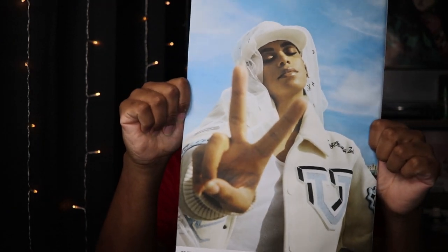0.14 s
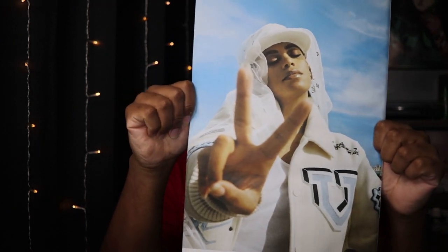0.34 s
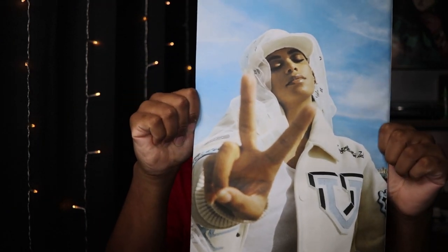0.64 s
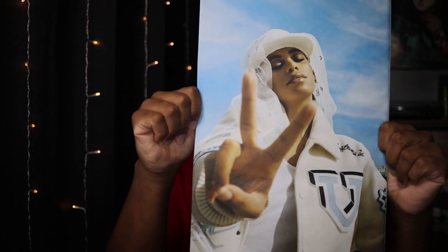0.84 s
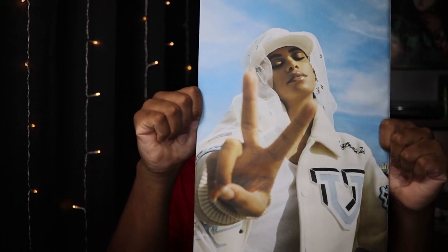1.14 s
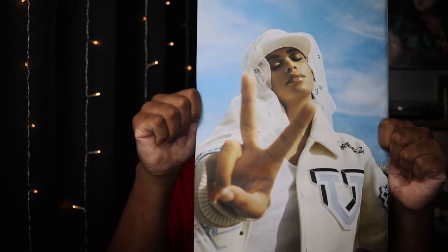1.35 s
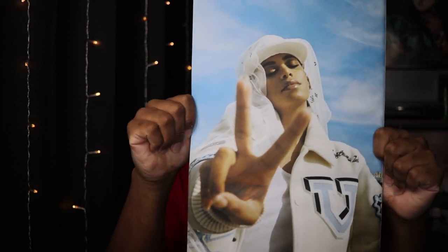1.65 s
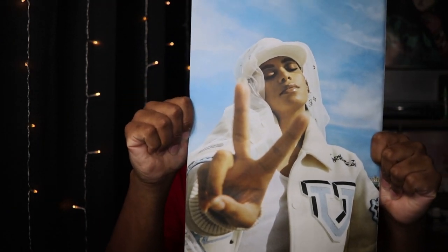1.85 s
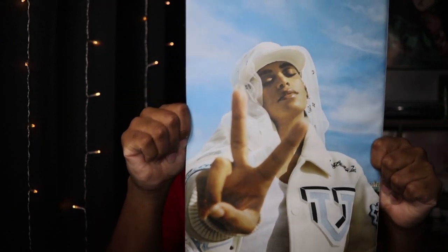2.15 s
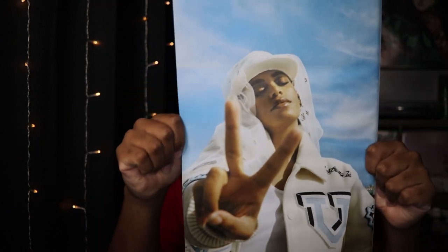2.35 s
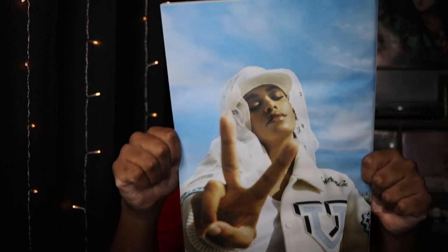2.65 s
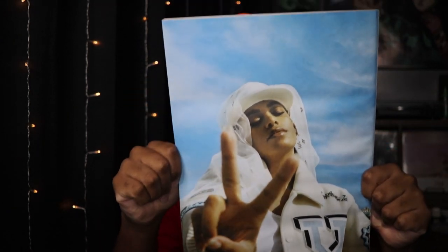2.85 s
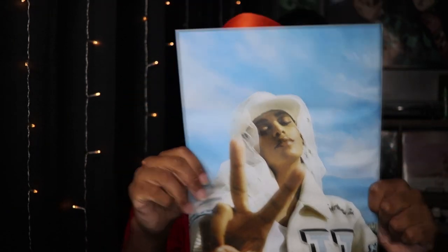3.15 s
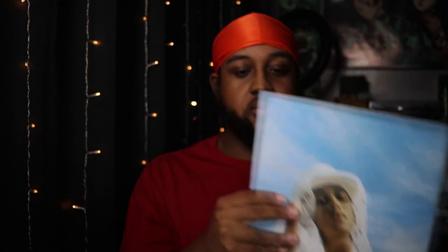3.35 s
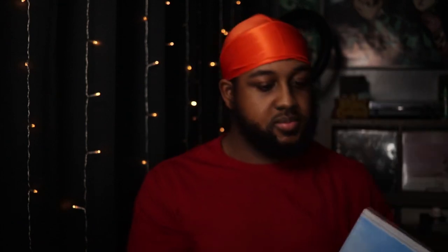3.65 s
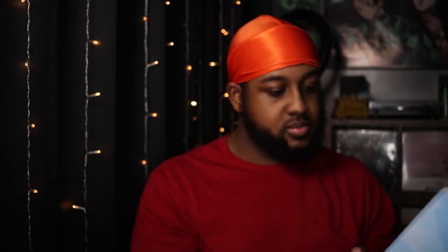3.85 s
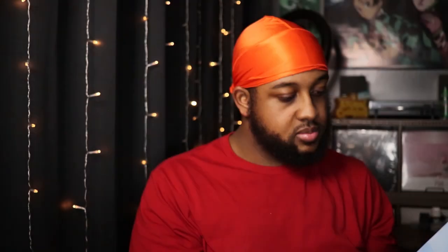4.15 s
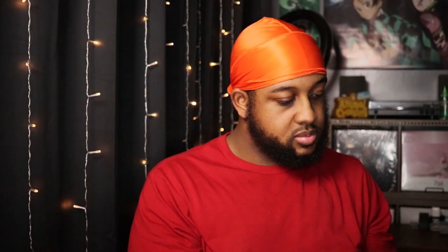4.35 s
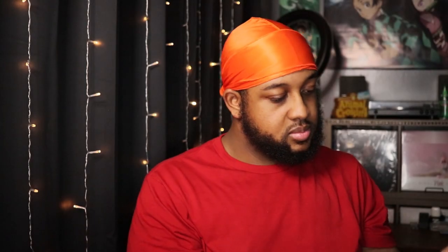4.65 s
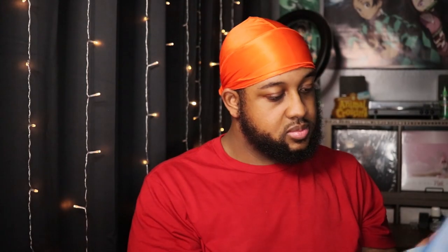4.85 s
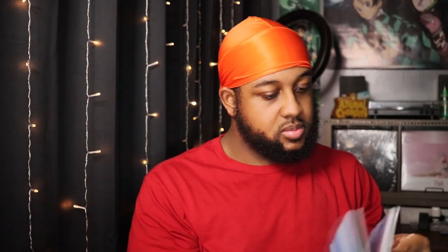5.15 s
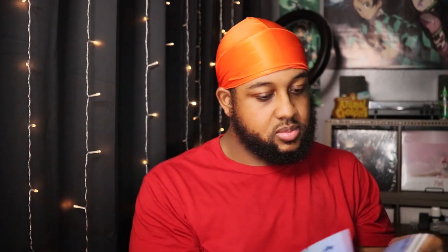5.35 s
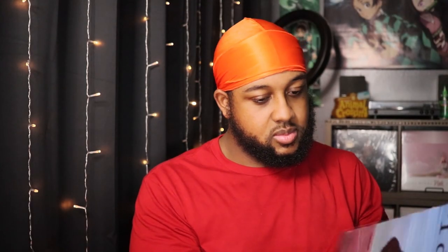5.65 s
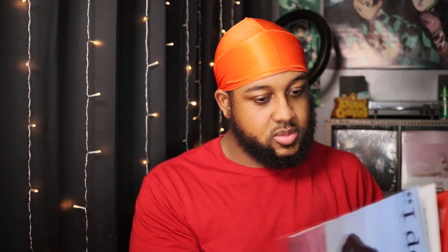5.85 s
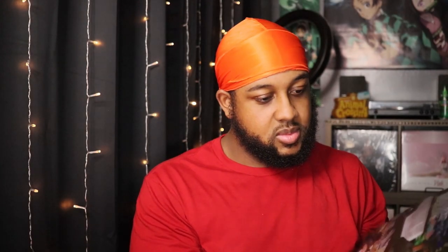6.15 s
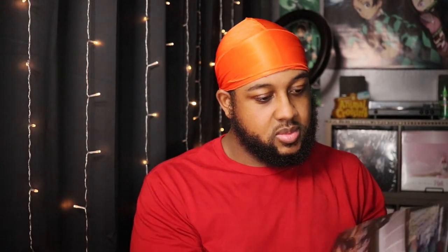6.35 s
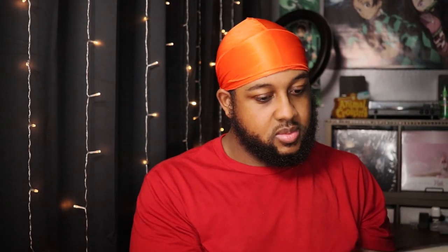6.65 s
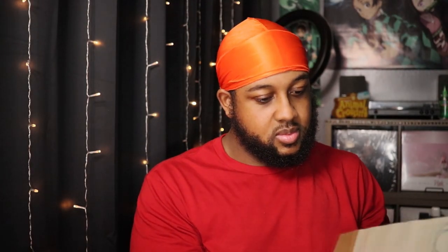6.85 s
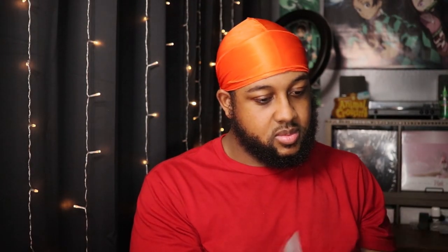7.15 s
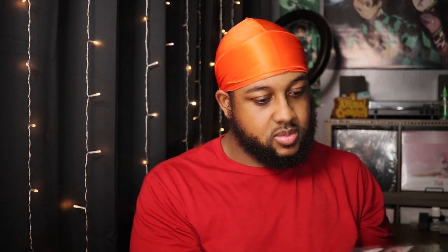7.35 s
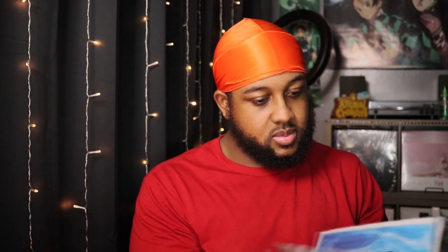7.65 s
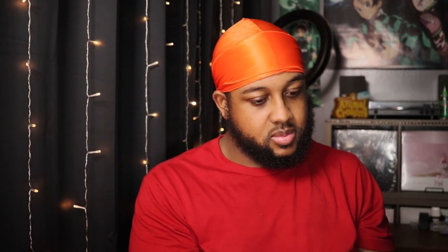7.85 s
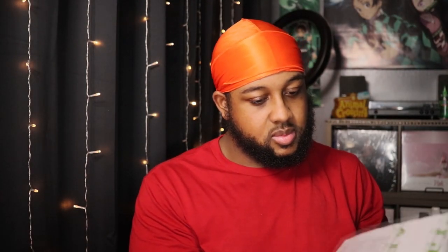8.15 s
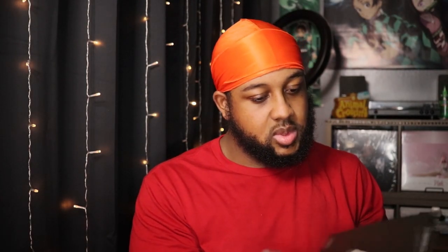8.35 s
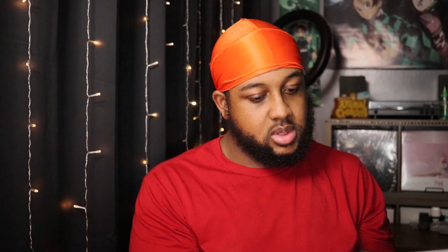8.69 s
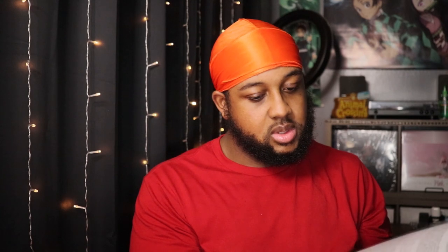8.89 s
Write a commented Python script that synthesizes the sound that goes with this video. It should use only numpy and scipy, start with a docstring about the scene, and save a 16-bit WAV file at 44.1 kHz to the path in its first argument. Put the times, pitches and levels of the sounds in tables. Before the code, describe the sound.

A small quiet room holds a steady, soft ventilation rumble with a wavering very low tone, slightly stronger on the left. From about 1 to 3.7 s a faint distant engine note swells unevenly and sinks slowly in pitch. Barely audible paper ticks and sizzles come near 0.7 to 1 s. At 3.15 s a large glossy sheet snaps sharply, then more snaps and crumples follow, with a bright crack at 3.8 and another cluster near 4.05. A very brief, faint low hum swells at 4.3. Pages slide with airy hiss and pop at 4.4, 4.7 and 5, with a strong hollow buckle at 5.35. Flexing continues around 5.7 to 6.1, thins out near 6.3, then lighter rustles and ticks run from 6.5, with duller pops at 7.35, crackles around 7.95 and 8.2, a crisp tick at 8.35 and last low creases near 8.7. Close stereo, short dry reverberation.

```python
"""Large glossy pages are handled and turned by hand near two microphones in a small quiet room.
Sliding sheets hiss and sizzle as showers of filtered grains, flexing ones crumple around the pitch of the bend,
and buckling creases snap as impulses with fluttering tails that excite the sheet's resonances.
A ventilation rumble of noise rings in the room's low modes above a wavering low tone;
a distant engine note, two gliding sines, sinks as it passes, and once a short low sine swells and fades."""
import sys
import numpy as np
from scipy import signal
from scipy.fft import rfft, irfft, next_fast_len
from scipy.io import wavfile
from scipy.ndimage import uniform_filter1d

SR = 44100
rng = np.random.default_rng(int(sys.argv[2]) if len(sys.argv) > 2 else 0)


def generate_wav(signal):
    """Clip the signal to [-1, 1] and save it as 16-bit WAV at the path in sys.argv[1]."""
    frames = np.transpose(np.atleast_2d(signal))
    scaled = np.clip(frames, -1, 1) * 32767
    pcm = np.round(scaled).astype(np.int16)
    wavfile.write(sys.argv[1], SR, pcm)


def elevation(decibels):
    """Turn decibel levels (scalar or array-like) into linear amplitude ratios."""
    levels = np.asarray(decibels, float)
    return 10 ** (levels / 20)


N = 397782   # length in samples
CONTROL_STEP = 40   # samples between points of a slow curve

# steady noise of the room air: f/Hz, relative level/dB per Hz
AIR_SPECTRUM = [(12, -42), (20, 8), (49, -9), (130, -3), (228, -3), (293, -7), (328, -13.5), (434, -5.5),
                (624, -14), (923, -19), (1150, -21), (1910, -28), (2700, -33.5), (4500, -37), (7310, -41),
                (14300, -52), (16000, -48)]
# room resonances in which the rumble rings: f/Hz, width/Hz, level/dB
ROOM_MODES = [(57.74, 8.1, 19), (116.4, 12.2, 11), (145.3, 17.7, 8), (208.8, 7, 8), (227.4, 11, 7),
              (269, 3.1, 5), (336.8, 17, 15.5), (425, 38, 3.5), (470, 10.5, 7.5), (526.5, 29, 6.5),
              (1167, 135, 6.5), (1520, 120, 5)]
# likeness of the air noise left and right: f/Hz, correlation/1
AIR_LIKENESS = [(60, 1), (130, 0.98), (290, 1), (640, 0.94), (1410, 0.78), (3100, -0.08), (6820, 0.054),
                (15000, -0.087)]
# swells of the engine note: peak t/s, rise t/s, fall t/s, level/dB
ENGINE_SWELLS = [(1.7, 0.22, 0.31, -33.5), (2.05, .3, 0.46, -39), (2.6, 0.57, .5, -30.5),
                 (3.2, 0.47, 0.14, -30.5), (3.43, 0.085, .1, -36.5), (3.59, 0.092, 0.16, -35.5)]
# swells of the engine's lower octave: peak t/s, rise t/s, fall t/s, level/dB
HALF_NOTE_SWELLS = [(1.1, 0.51, 1.4, -41.5), (3.2, 1.5, .5, -49)]
# one sheet slides over another: peak t/s, rise t/s, fall t/s, slide level/dB, sizzle level over slide/dB
SLIDES = [(.655, .03, .04, -73, 12), (.75, .06, .06, -70, 9), (.96, .03, .04, -74, 13),
          (1.02, .04, .03, -67, 12), (3.166, 0.022, .06, -41, -18), (3.36, 0.1, 0.13, -45, 1.5),
          (3.55, 0.09, 0.25, -49.5, -6), (3.66, 0.29, 0.13, -45.5, -6), (3.79, .015, .025, -42, -13),
          (3.815, .006, .07, -35, -15), (3.93, .1, .15, -49.5, -2), (4.065, 0.094, 0.11, -41.5, -2),
          (4.28, 0.5, .3, -58.5, -5), (4.42, 0.14, .15, -49, -4), (4.6, .2, 0.19, -53.5, -9),
          (4.655, .02, .03, -57, 5), (4.73, 0.024, 0.18, -45.5, -5), (4.95, 0.28, 0.41, -53, -6),
          (5.15, 0.15, .15, -50.5, 0), (5.25, .15, 0.35, -48, 0.5), (5.47, 0.19, .25, -55, -5),
          (5.69, 0.13, 0.15, -50.5, -6), (5.89, .05, 0.11, -45.5, -7), (6.0, .2, .15, -50, -6),
          (6.49, .05, .1, -59, -8), (6.75, .2, 0.39, -49, -2), (6.895, .015, 0.044, -47.5, -6.5),
          (6.983, 0.0079, 0.038, -53.5, -12), (7.053, 0.011, 0.044, -49.5, -11),
          (7.29, 0.11, 0.087, -55, -12), (7.41, .03, 0.054, -53, -6), (7.49, .08, .06, -53.5, -4),
          (7.575, .05, 0.044, -52, -5), (7.65, 0.036, .05, -54, -5), (7.69, .04, .06, -52.5, -8),
          (7.86, .05, .05, -62, -13), (8.155, .015, 0.091, -51, -13), (8.215, .04, .07, -52, -13),
          (8.352, .012, .06, -51, -4), (8.62, .1, 0.054, -56.5, -8), (8.76, .05, .08, -55.5, -6)]
# hiss of sliding paper: f/Hz, relative level/dB per Hz
SLIDE_SPECTRUM = [(1200, -25), (2300, -13), (3200, -5), (4300, -1), (6000, -5), (8500, -8), (11000, -15),
                  (16000, -28)]
# fine sizzle of sliding paper: f/Hz, relative level/dB per Hz
SIZZLE_SPECTRUM = [(6000, -5), (8500, -0.5), (11000, -5), (13500, -1), (15500, -7), (17000, -30)]
# crease snaps: t/s, body peak level/dB, edge level over body/dB, treble level over body/dB, bend f/Hz
SNAPS = [(.705, -40, -6, 6, 1500), (3.146, -43, -5, -8, 1500), (3.164, -24, 0, -4, 1100),
         (3.516, -25, -10, -31, 1100), (3.668, -22, 1, -29, 1130), (3.706, -33, -15, -25, 962),
         (3.784, -30, 0.5, -8, 1670), (3.811, -21, 3, -1, 4500), (3.903, -31, -12, -21, 1560),
         (4.047, -22, -1, -12, 1480), (4.063, -24.5, 4.5, -12, 1620), (4.404, -23, 1, -21, 3000),
         (4.506, -39.5, 7.5, -20, 3330), (4.713, -26.5, 0, -3, 1280), (4.968, -25, -20, -28, 1090),
         (5.214, -35, -20, -18, 1320), (5.352, -20.5, -8, -32, 1830), (5.389, -27.5, -17, -25, 1700),
         (5.589, -30, -2, -16, 2220), (5.687, -30.5, -16, -23, 1710), (5.754, -40, 3.5, -20, 3000),
         (5.889, -38, 2, -14, 1580), (6.059, -30.5, -20, -35, 1430), (6.092, -35, -18, -30, 1610),
         (6.125, -27, -10, -42, 1530), (6.489, -37, -19, -24, 1500), (6.633, -36, -3, -24, 2020),
         (6.729, -39, 4, -14, 2040), (6.832, -34, -7, -20, 1900), (6.888, -31.5, 2.5, -4, 1920),
         (6.976, -33, -1, -15, 2120), (7.046, -30, -4, -4, 1600), (7.239, -36.5, -14, -28, 1640),
         (7.336, -24, -16, -35, 860), (7.359, -29, -28, -30, 850), (7.449, -38, -1, -15, 1500),
         (7.484, -37, -11, -14, 1500), (7.522, -38, 0.5, -20, 2200), (7.57, -37, 4, -12, 2200),
         (7.639, -36, -4, -13, 2100), (7.68, -37.5, -3, -17, 2000), (7.859, -36, 1, -30, 2120),
         (7.929, -28.5, -16, -38, 1300), (7.948, -29, -7, -36, 1560), (7.99, -29.5, -20, -36, 1500),
         (8.149, -29, -7, -11, 2200), (8.178, -30, -2, -24, 2250), (8.209, -26, -4.5, -22, 2300),
         (8.344, -33, 4, 0, 3830), (8.556, -32, -14, -26, 2250), (8.617, -38, 2, -19, 2500),
         (8.696, -32.5, -24, -35, 880), (8.708, -34, -25, 7, 860)]
# mean sheet resonances, lower four its body, upper four its edge: f/Hz, width/Hz, relative level/dB
SHEET_MODES = [(850, 160, 7.5), (1220, 410, 0.5), (1500, 510, 4.5), (2250, 720, -3), (3000, 870, 12.5),
               (4140, 3100, 3), (4360, 120, -1), (5040, 4000, 13)]
# a sheet flexes: peak t/s, rise t/s, fall t/s, crumple level/dB, bend f/Hz
FLEXES = [(3.165, .02, .06, -45, 1600), (3.35, 0.14, .15, -44.5, 1700), (3.55, .15, .2, -49.5, 1210),
          (3.68, 0.11, 0.15, -41, 1200), (3.812, 0.022, 0.042, -33, 1500), (3.815, .006, .07, -31, 4800),
          (3.92, .1, 0.18, -50, 1500), (4.065, .12, 0.12, -39.5, 1600), (4.14, .05, 0.18, -51.5, 2000),
          (4.405, .12, 0.074, -47, 2000), (4.55, .15, 0.29, -46, 1510), (4.72, .02, 0.11, -41, 1290),
          (4.95, .2, .15, -52, 1200), (5.2, .25, 0.28, -49, 1400), (5.358, .025, .09, -30, 1900),
          (5.358, .015, .05, -38, 4400), (5.67, .15, 0.13, -45, 1700), (5.9, .1, .15, -46, 1610),
          (6.05, 0.14, 0.08, -43.5, 1400), (6.133, .03, .08, -38, 1720), (6.13, .015, .045, -42, 3300),
          (6.49, .05, 0.055, -54, 1500), (6.78, 0.23, 0.21, -50, 1960), (7.28, 0.12, .08, -42.5, 1680),
          (7.35, 0.058, 0.1, -38.5, 900), (7.57, .2, .15, -53, 1200), (7.86, 0.095, 0.091, -46, 2080),
          (7.95, 0.042, 0.043, -39, 1490), (7.95, .03, .05, -50, 3500), (8.0, 0.041, 0.077, -42, 1490),
          (8.19, 0.058, 0.11, -45.5, 2250), (8.35, .008, .05, -42, 4000), (8.57, 0.055, 0.09, -47, 2100),
          (8.72, 0.044, 0.11, -41.5, 900)]
# crumple of flexing paper: f/Hz, relative level/dB per Hz
CRUMPLE_SPECTRUM = [(400, -26), (750, 5.5), (1100, 1.5), (1700, -2.5), (2400, -6), (3500, -10.5),
                    (6000, -43)]
# swell of the short low note: peak t/s, rise t/s, fall t/s, level/dB
LOW_NOTE_SWELLS = [(4.3, .12, .12, -36)]


def rms_one(x):
    """Normalization: the mean square is brought to one."""
    return x / np.sqrt(np.mean(x ** 2) + 1e-20)


def at_hz(points, hz):
    """Spectral interpolation: levels run straight along a logarithmic frequency axis."""
    point_hz, level = np.array(points).T
    return np.interp(np.log(hz + 1), np.log(point_hz), level)


def coloured(x, gain):
    """Linear filtering: the spectrum is multiplied by a gain function of frequency."""
    size = next_fast_len(N)
    spectrum = rfft(x, size) * gain(np.fft.rfftfreq(size, 1 / SR))
    return irfft(spectrum, size)[..., :N]


def drift(rate_hz):
    """Low-passed noise: a double real pole leaves slow random motion of unit spread."""
    r = np.exp(-2 * np.pi * rate_hz * CONTROL_STEP / SR)
    start = 2000   # points left for the filter to settle
    white = rng.standard_normal(N // CONTROL_STEP + 2 + start)
    slow = signal.lfilter([1], [1, -2 * r, r * r], white)[start:]
    return np.interp(np.arange(N) / CONTROL_STEP, np.arange(len(slow)), rms_one(slow))


def swells(rows):
    """Incoherent addition: swells (peak s, rise s, fall s, dB) sum in power to one amplitude envelope."""
    swell_db = 20     # rise and fall are the times over this many dB
    roundness = 1.19  # 1 a pointed peak, 2 a bell
    t = np.arange(0, N + CONTROL_STEP, CONTROL_STEP) / SR
    power = 0
    for s, rise, fall, db in rows:
        away = np.where(t < s, (s - t) / max(rise, .005), (t - s) / max(fall, .005))
        power = power + elevation(db - swell_db * np.minimum(away, 3) ** roundness) ** 2
    return np.interp(np.arange(N) / SR, t, np.sqrt(power))


def resonate(x, hz, width_hz):
    """Simple resonance: a damped pole pair with a gain of about one at its peak."""
    r = np.exp(-np.pi * width_hz / SR)
    poles = [1, -2 * r * np.cos(2 * np.pi * hz / SR), r * r]
    return signal.lfilter([(1 - r * r) / 2, 0, (r * r - 1) / 2], poles, x)


def grains(spectrum, per_s, spread_db, clump_db, apart):
    """Shot noise: uneven fibre slips come in clumps; `apart` is the power share unrelated left and right."""
    sizes = elevation(spread_db * np.minimum(rng.exponential(1, (3, N)), 5))
    sizes = sizes * rng.standard_normal((3, N))
    happens = rng.random((3, N)) < per_s / SR
    slips = sizes * happens * elevation(clump_db * drift(30))
    heard = np.sqrt(1 - apart) * slips[0] + np.sqrt(apart) * slips[1:]
    return rms_one(coloured(heard, lambda hz: elevation(at_hz(spectrum, hz))))


def air():
    """Modal excitation: steady broadband noise is lifted at the room modes, alike on both sides in the bass."""
    def colour(hz):
        lift = 0
        for centre, width, db in ROOM_MODES:
            lift = lift + (elevation(db) ** 2 - 1) / (1 + (2 * (hz - centre) / width) ** 2) ** 2
        return elevation(at_hz(AIR_SPECTRUM, hz)) * np.sqrt(np.maximum(1 + lift, .01))

    def likeness(hz):
        return np.clip(at_hz(AIR_LIKENESS, hz), -1, 1)

    mid, side = rng.standard_normal((2, N))
    mid = coloured(mid, lambda hz: colour(hz) * np.sqrt(1 + likeness(hz)))
    side = coloured(side, lambda hz: colour(hz) * np.sqrt(1 - likeness(hz)))
    # the rumble comes from the left: it is stronger there, and the right lags by 5 samples
    both = np.array([mid + side, np.roll(mid - side, shift=5)])
    return elevation(-33.5) * rms_one(both) * elevation([[.45], [-.45]])


def fan():
    """Rotational tone: the ventilation's lowest turning note wavers slightly in pitch and level."""
    hz = 35.2 + .5 * drift(0.55)
    level_db = -51.5 + 0.88 * drift(0.76)
    return np.sqrt(2) * elevation(level_db) * np.sin(2 * np.pi * np.cumsum(hz) / SR)


def engine():
    """Periodic firing: a note and its lower octave, slightly unsteady, sink steadily as the engine passes."""
    start_hz, sag_hz_per_s = 164.2, 5.5
    hz = start_hz - sag_hz_per_s * np.arange(N) / SR + 0.68 * drift(5.2)
    phase = 2 * np.pi * np.cumsum(hz) / SR
    note = swells(ENGINE_SWELLS) * np.sin(phase)
    half_note = swells(HALF_NOTE_SWELLS) * np.sin(phase / 2)
    return np.sqrt(2) * (note + half_note)


def slides():
    """Friction noise: fibre slips between sliding sheets add up to a hiss and a finer sizzle."""
    hiss = grains(SLIDE_SPECTRUM, per_s=6000, spread_db=3.0, clump_db=2.0, apart=0.98)
    sizzle = grains(SIZZLE_SPECTRUM, per_s=10000, spread_db=2.0, clump_db=1.0, apart=0.93)
    hiss_swell = swells([row[:4] for row in SLIDES])
    sizzle_swell = swells([(s, rise, fall, db + over_db) for s, rise, fall, db, over_db in SLIDES])
    return hiss_swell * hiss + sizzle_swell * sizzle


def room(x):
    """Diffuse reverberation: dense decaying reflections, unrelated left and right, are dulled by the walls."""
    t60_s, level_db, wall_cut_hz = 0.063, -11, 9800
    t = np.arange(int(.4 * SR)) / SR
    tail = rng.standard_normal((2, len(t))) * elevation(-60 * t / t60_s)
    tail = tail * (t > .003)   # the first reflection takes 3 ms
    tail = signal.sosfilt(signal.butter(1, wall_cut_hz, fs=SR, output="sos"), tail)
    tail = tail / np.sqrt(np.sum(tail ** 2) / 2)
    return elevation(level_db) * signal.fftconvolve(x, tail, axes=1)[:, :N]


def snaps():
    """Impulse excitation: each buckle's crack and flutter ring the sheet's modes, most near the bend's pitch."""
    crack_s, flutter_db = .00004, -17        # crack decay; flutter level at onset
    uneven_db, mode_shift = 3.5, .04         # chance spread of mode level, and of mode pitch as a share
    off_bend_db = 10.5                       # loss per octave away from the bend's pitch
    bend_width, bend_over_db = 0.046, -9     # the bend's own note: width as a share of its pitch, level
    treble_t60_s, side_db = .07, 2.0         # added treble decay; chance spread of left over right
    out = np.zeros((2, N))
    t = np.arange(int(.2 * SR)) / SR
    noise = rng.standard_normal((len(SNAPS), 3, len(t)))
    chance = rng.standard_normal((len(SNAPS), 2, len(SHEET_MODES)))
    crack = np.exp(-t / crack_s)     # one steep step of the sheet
    edge_pass = signal.butter(2, 8300, fs=SR, output="sos")
    treble_pass = signal.butter(2, 6500, "high", fs=SR, output="sos")
    for draw, (shift, strength), (s, db, edge_db, treble_db, bend_hz) in zip(noise, chance, SNAPS):
        # the crack is one point; the flutter runs along the sheet in uneven slips and differs left and right
        slips = draw[:2] * elevation(3.5 * rms_one(uniform_filter1d(draw[2], size=60)))
        # stronger snaps flutter more briefly
        flutter_t60_s = np.clip(.11 - 0.04 * (db + 27.5), .02, .25)
        burst = crack + slips * elevation(flutter_db - 60 * t / flutter_t60_s)
        rings = []
        for k, (hz, width, level_db) in enumerate(SHEET_MODES):
            ring_db = level_db + uneven_db * strength[k] - off_bend_db * abs(np.log2(hz / bend_hz))
            ring = resonate(burst, hz * (1 + mode_shift * shift[k]), width)
            rings.append((-1) ** k * elevation(ring_db) * ring)   # neighbouring modes in opposite phase
        body = sum(rings[:4])
        edge = signal.sosfilt(edge_pass, sum(rings[4:]))
        treble = signal.sosfilt(treble_pass, burst) * elevation(-60 * t / treble_t60_s)
        bend_note = resonate(burst, bend_hz, bend_width * bend_hz)
        # the note of a bend above 2700 Hz follows the edge level, otherwise the body level
        bend_db = bend_over_db + edge_db * (bend_hz > 2700)
        parts = [(0, body), (edge_db, edge), (treble_db, treble), (bend_db, bend_note)]
        snap = sum(elevation(db + over_db) * part / np.abs(part).max() for over_db, part in parts)
        balance = elevation(side_db * shift[0] * np.array([[.5], [-.5]]))
        at = round(s * SR)
        out[:, at:at + len(t)] += snap[:, :N - at] * balance
    return out


def crumple():
    """Resonant filtering: the grain noise of each flex is lifted around the pitch of the curved sheet."""
    bend_width, bend_db = .6, -8   # width of each filter pass as a share of the pitch; note level over grains
    bend_db_per_octave = 22        # tighter bends, above 2300 Hz, give more of their note
    paper = grains(CRUMPLE_SPECTRUM, per_s=2000, spread_db=3.0, clump_db=2.5, apart=0.41)
    out = np.zeros((2, N))
    for s, rise, fall, db, bend_hz in FLEXES:
        near = slice(round((s - 2 * rise) * SR), round((s + 2 * fall) * SR))
        note = paper[:, near]
        for _ in range(3):   # steep skirts
            note = rms_one(resonate(note, bend_hz, bend_width * bend_hz))
        note_db = bend_db + bend_db_per_octave * max(np.log2(bend_hz / 2300), 0)
        flex = rms_one(paper[:, near] + elevation(note_db) * note)
        out[:, near] += flex * swells([(s, rise, fall, db)])[near]
    return out


def low_note():
    """Pure tone: one brief low sine swells and fades."""
    note_hz = 288
    return np.sqrt(2) * swells(LOW_NOTE_SWELLS) * np.sin(2 * np.pi * note_hz * np.arange(N) / SR)


def scene():
    """Superposition: paper, reaching the left microphone a little later, adds to its reverberation and the rest."""
    left_lag_s = .00005
    paper = slides() + crumple() + snaps()
    paper[0] = np.interp(np.arange(N) - left_lag_s * SR, np.arange(N), paper[0])
    return paper + room(paper) + air() + fan() + engine() + low_note()


def band_limit(x):
    """A steep low-pass at the top of the band."""
    return signal.sosfilt(signal.butter(12, 16370, fs=SR, output="sos"), x)


def record(dry):
    """Band limiting: the microphones drop the deepest bass and a steep filter cuts the top."""
    low_cut_hz, top_cut_hz = 33, 16150
    x = signal.sosfilt(signal.butter(8, low_cut_hz, "high", fs=SR, output="sos"), dry)
    mix = signal.sosfilt(signal.cheby2(14, 50, top_cut_hz, fs=SR, output="sos"), x)
    return band_limit(mix)


dry = scene()
out = record(dry)
generate_wav(out)
```